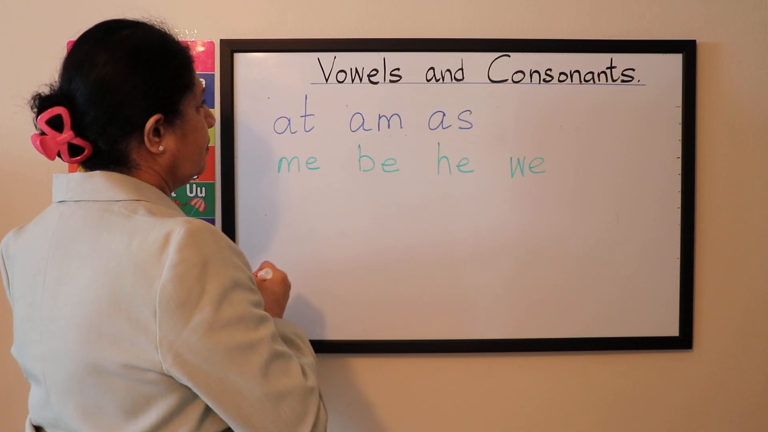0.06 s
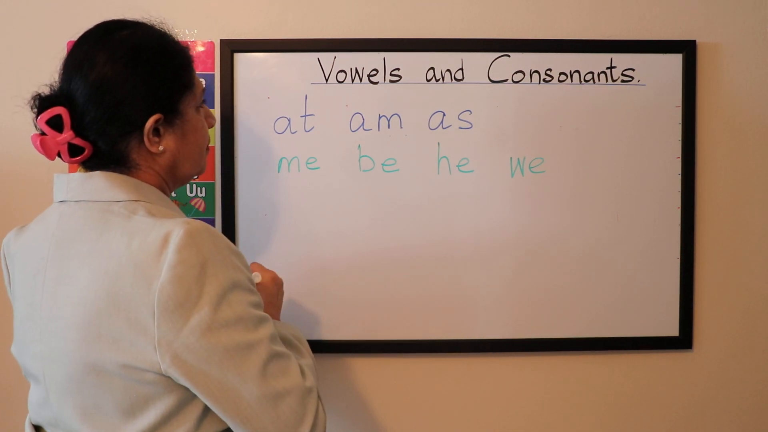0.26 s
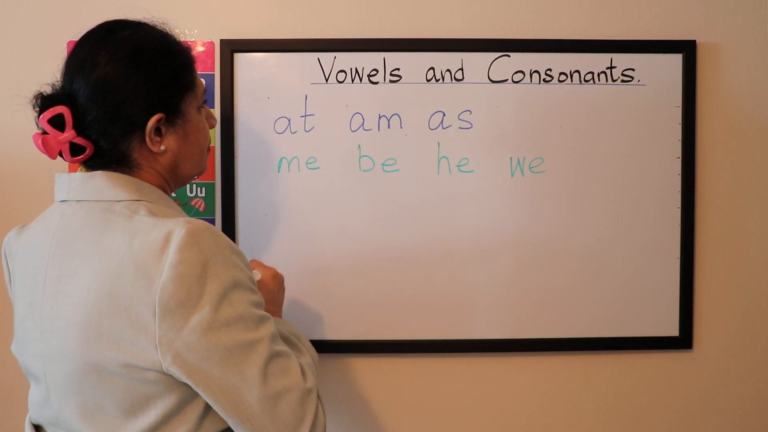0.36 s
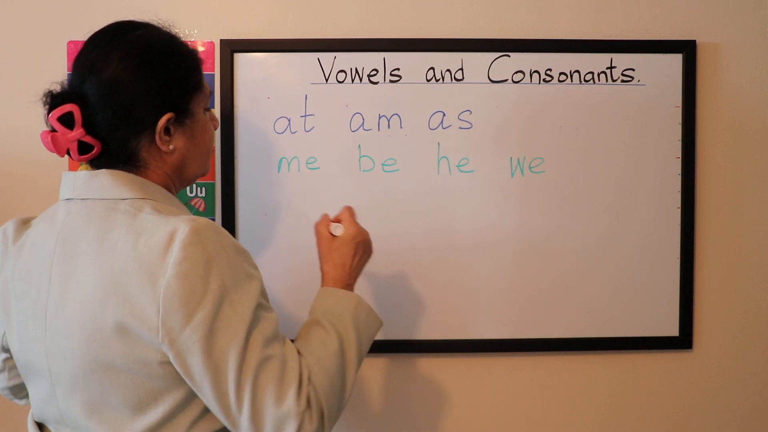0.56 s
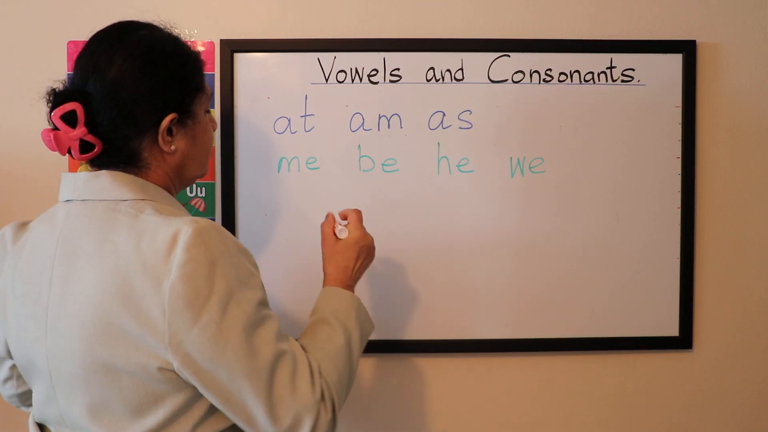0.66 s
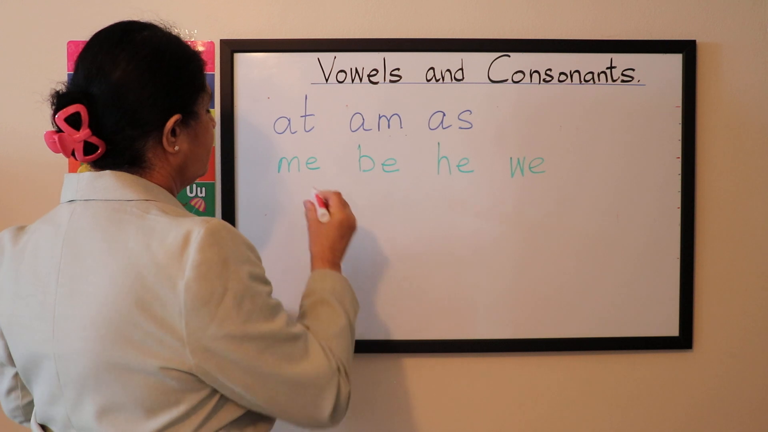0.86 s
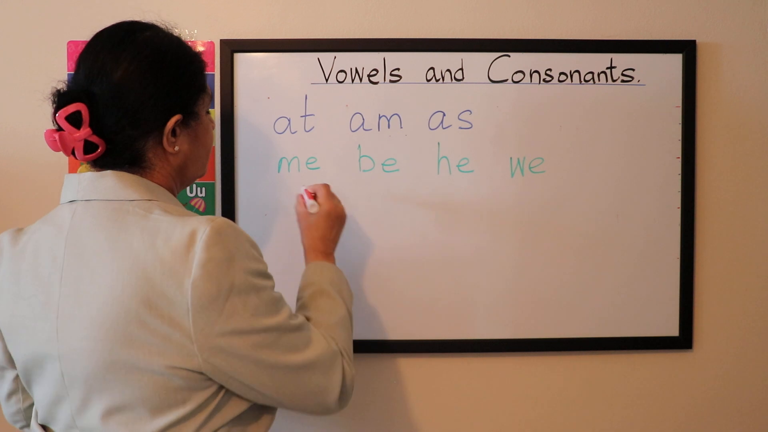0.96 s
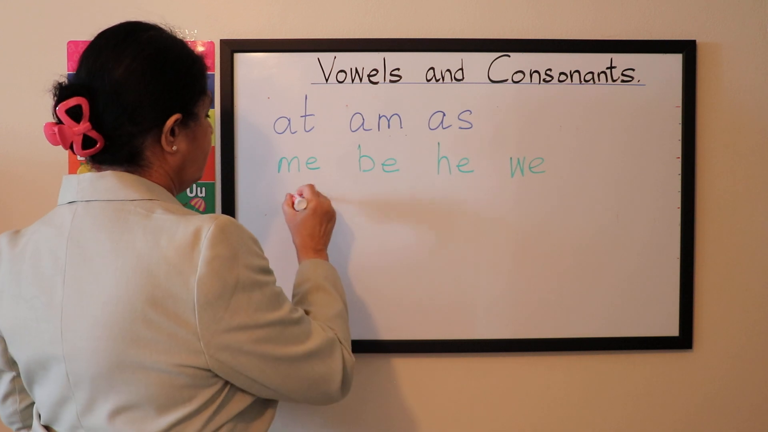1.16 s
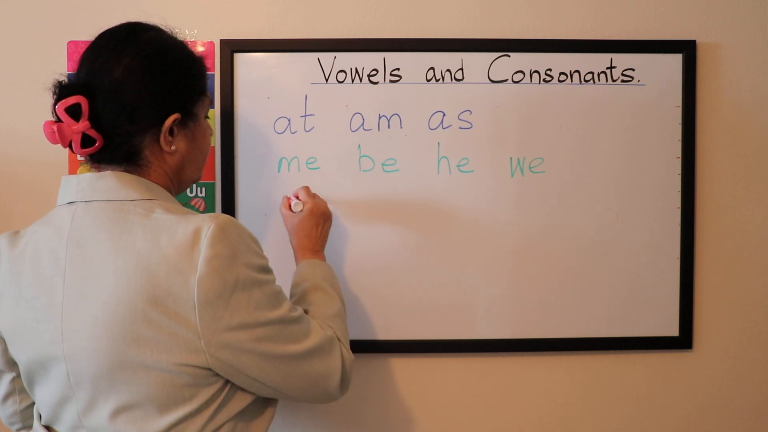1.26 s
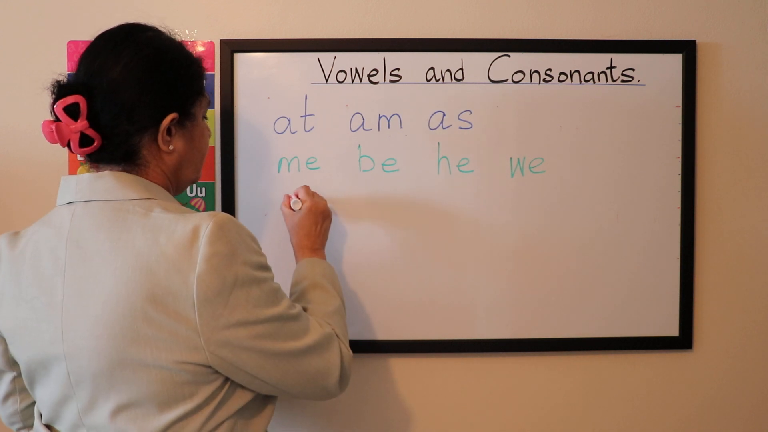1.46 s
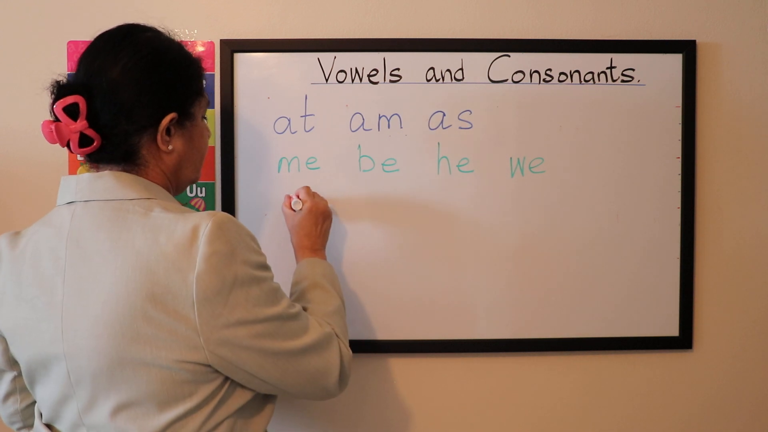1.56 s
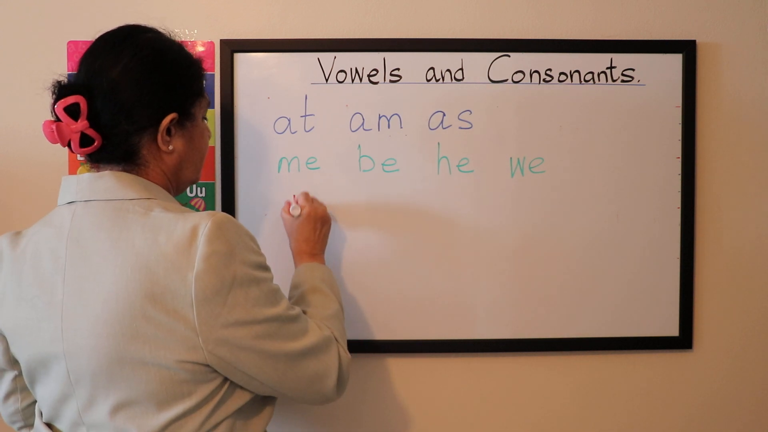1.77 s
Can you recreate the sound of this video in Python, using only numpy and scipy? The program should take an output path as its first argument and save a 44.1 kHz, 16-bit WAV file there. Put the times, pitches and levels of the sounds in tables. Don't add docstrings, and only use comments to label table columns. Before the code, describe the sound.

Light finger taps on a plastic pen, then a short ratcheting burst of crisp clicks as its cap comes loose with small hollow knocks, echoing briefly in a hard classroom with steady ventilation rumble and soft hiss.

```python
import sys
import numpy as np
from scipy import signal
from scipy.fft import rfft, irfft, next_fast_len
from scipy.io import wavfile

SR = 44100
rng = np.random.default_rng(int(sys.argv[2]) if len(sys.argv) > 2 else 0)


def materialize(psi):
    bounded = np.clip(np.atleast_2d(psi).T, -1, 1)
    quanta = np.round(bounded * 32767).astype(np.int16)
    wavfile.write(sys.argv[1], SR, quanta)


def volts(x):
    e = np.asarray(x, float) / 20
    return 10 ** e


N = 79380


def along(points, hz):
    point_hz, value = np.transpose(points)
    return np.interp(np.log(hz + 1), np.log(point_hz + 1), value)


def filtered(x, response):
    size = next_fast_len(N + 8192)
    spectrum = rfft(x, size) * response(np.fft.rfftfreq(size, 1 / SR))
    return irfft(spectrum, size)[..., :N]


# pitch_hz, likeness [-1 to 1]
LIKENESS = [(60, 0.85), (180, 0.83), (550, 0.41), (1650, -0.043), (4970, -0.071), (15000, 0.03)]


def rush(shape, level_db):
    def mid_and_side(hz):
        angle = np.arccos(np.clip(along(LIKENESS, hz), -1, 1)) / 2
        return shape(hz) * np.array([np.cos(angle), np.sin(angle)])

    mid, side = filtered(rng.standard_normal((2, N)), mid_and_side)
    return volts(level_db) * np.array([mid + side, mid - side]) / np.std(mid)


# pitch_hz, level_db [per Hz]
AIR = [(12, -22), (22, -1.5), (40, -6.5), (150, -8), (260, -12.5), (527, -14.5), (659, -22.5),
       (1200, -22.5), (1560, -53), (2640, -120)]
# pitch_hz, level_db [per Hz]
HISS = [(710, -42), (1200, -2), (1460, -4), (2570, -9), (4840, -17), (6930, -13.5), (10900, -14.5),
        (14800, -24), (16200, -22)]
# pitch_hz, level_db, width_hz
DUCT = [(519, -66.5, 8.3), (406.4, -70, 23), (850.5, -76.5, 18), (1348, -76.5, 24)]
# pitch_hz, level_db
FAN = [(58.4, -62), (119.9, -62), (175.8, -68), (233.6, -55), (239.9, -60), (227.4, -70), (469.8, -75),
       (694.5, -74), (700.7, -69)]


def ventilation():
    air = rush(lambda hz: volts(along(AIR, hz)), -51.5)
    hiss = rush(lambda hz: volts(along(HISS, hz)), -59.5)
    out = air + hiss
    t = np.arange(N) / SR - 0.826
    side = np.array([[-1], [1]])
    for pitch_hz, level_db in FAN:
        out += volts(level_db + 3 + 0.8 * side) * np.cos(2 * np.pi * pitch_hz * t + 0.2 * side)
    for pitch_hz, level_db, width_hz in DUCT:
        out += rush(lambda hz: 1 / (1 + (2 * (hz - pitch_hz) / width_hz) ** 2), level_db)
    return out


def strike(out, start_s, modes, gain, attack_s, size=2048):
    start = int(start_s * SR) + 1
    t = (start + np.arange(size)) / SR - start_s
    pitch_hz, level_db, t60_s = np.transpose(modes)[:, :, None]
    ring = np.sum(volts(level_db - 60 * t / t60_s) * np.sin(2 * np.pi * pitch_hz * t), axis=0)
    ring *= (1 - np.exp(-t / attack_s)) ** 2
    out[:, start:start + size] += np.outer(gain, ring)[:, :out.shape[1] - start]


# pitch_hz, t60_s
ROOM = [(300, 0.55), (2000, 0.39), (6000, 0.28), (12000, .2), (16000, 0.18)]
ROOM_DB, ROOM_GAP_S = 2.5, 0.0018


def tail():
    hz, t, spectrum = signal.stft(rng.standard_normal((2, SR // 2)), SR, nperseg=256)
    fade = volts(-60 * t / along(ROOM, hz)[:, None])
    answer = signal.istft(spectrum * fade, SR, nperseg=256)[1]
    return np.pad(answer / np.linalg.norm(answer[0]), ((0, 0), (int(ROOM_GAP_S * SR), 0)))


def room(x, answer):
    return volts(ROOM_DB) * signal.fftconvolve(x[:1], answer, axes=1)[:, :N]


# start_s, level_db, pitch_hz, crack_db
TICKS = [(.002, -43, 2900, -11), (.034, -54, 2520, -14), (.061, -42.5, 2980, -20), (.066, -47, 2740, -16),
         (.099, -56.5, 2280, -16), (.130, -43, 3130, -16), (.1305, -37, 1200, -23), (.164, -46.5, 2860, -8),
         (.197, -51, 3430, -15), (.228, -43, 3000, -18), (.9785, -46, 2450, -11), (1.085, -48, 1750, -16),
         (1.4085, -56, 3270, -14), (1.544, -51, 2200, -16), (1.6085, -47, 3480, -11),
         (1.611, -42.5, 2050, -17), (1.6127, -41.5, 8700, 3), (1.616, -44, 2500, -14),
         (1.617, -42, 2020, -19), (1.775, -60, 3000, -14)]


def fingers():
    out = np.zeros((2, N))
    t = np.arange(512) / SR
    t60_s, crack_t60_s = 0.016, 0.0046
    for start_s, level_db, pitch_hz, crack_db in TICKS:
        modes = [(pitch_hz, 0, t60_s),
                 (pitch_hz * 1.3, -6, t60_s * 0.71),
                 (pitch_hz * 0.797, -7, t60_s * 0.76)]
        strike(out, start_s, modes, volts(level_db + np.array([-1.5, 0])), attack_s=0.0004)
        crack = volts(level_db + crack_db - 60 * t / crack_t60_s) * rng.standard_normal(len(t))
        out[:, int(start_s * SR):][:, :len(t)] += crack
    return out + volts(-7.5) * room(out, tail())


def thin(hz):
    bass_loss = (1j * hz / (760 + 1j * hz)) ** 2
    notch_hz, notch_width_hz, notch_depth = 4840, 320, 0.63
    band = 1j * hz * notch_width_hz
    return bass_loss * (1 - notch_depth * band / (notch_hz ** 2 - hz * hz + band))


# pitch_hz, level_db, t60_s, change_db [first slip to last]
RIM = [(12000, -1, 0.0017, -5.5), (13800, -4.5, 0.0011, 0), (6300, -9.5, 0.0026, -6.5)]
# pitch_hz, level_db, t60_s, change_db [first slip to last]
BARREL = [(2270, 3, 0.0025, 4.5), (2900, -0.5, 0.0034, -3), (3685, 9, 0.0024, -8),
          (1385, -12.5, 0.0055, 7.5), (900, -24, 0.0034, 13.5)]


def slip_modes(ring_hz, treble_db, barrel_db, progress):
    modes = [(ring_hz, 0, 0.0044)]
    modes += [(hz, db + treble_db + change_db * progress, t60_s) for hz, db, t60_s, change_db in RIM]
    modes += [(hz, db + barrel_db + change_db * progress, t60_s) for hz, db, t60_s, change_db in BARREL]
    luck = rng.standard_normal((len(modes), 2))
    return [(hz * (1 + 0.012 * detune), db + 1.2 * scatter, t60_s)
            for (hz, db, t60_s), (detune, scatter) in zip(modes, luck)]


# start_s, level_db [snap], barrel_db [barrel under the snap], pitch_hz [cap ring]
SLIPS = [(0.2366, -18.5, -7, 7060), (.2510, -12.5, -9.5, 6500), (0.2628, -12.5, -14, 6620),
         (0.2705, -10.5, -12.5, 6900), (0.279, -15, -13.5, 7100), (.2863, -9.5, -13, 7060),
         (0.2946, -9.5, -14, 7100), (0.3034, -19, -19, 7340), (0.3121, -11, -12, 7400),
         (0.3245, -9, -15, 7700), (0.3383, -9, -12, 7300), (0.35, -15.5, -18.5, 7260),
         (0.3655, -5.5, -15.5, 7900), (.3814, -10, -13.5, 7180), (0.3988, -6, -14, 7860),
         (0.4213, -6.5, -13.5, 7500), (0.4458, -7, -15, 7140)]
# delay_ms, left_db, right_db, pitch_hz [ring on this path], treble_db
ECHOES = [(1.1, -10, -6, 8400, 5), (1.4, -10, -6, 7700, 4), (4.2, -3, -5, 8100, 9), (4.8, -4, -2, 9450, 6),
          (5.4, -12, -8, 8000, 3),
          (9.8, -17, -12, 7700, 0), (11.6, -10, -17, 7700, 0), (17.3, -13, -12, 8200, 2),
         (19.9, -19, -13, 8600, 3)]


def cap():
    near = np.zeros((2, N))
    far = np.zeros((2, N + SR))
    shared_tail = tail()
    echoes = ECHOES
    lags_ms = np.append(0, 0.019 * rng.standard_normal(len(echoes)))
    attack_s, size = 0.000059, 400
    first_s, last_s = SLIPS[0][0], SLIPS[-1][0]
    for start_s, level_db, barrel_db, cap_hz in SLIPS:
        progress = (start_s - first_s) / (last_s - first_s)
        into_room = np.zeros((1, 1024))
        direct = (0.00036, -2, 0, cap_hz, -3)
        for path, lag_ms in zip([direct] + echoes, lags_ms):
            delay_ms, left_db, right_db, ring_hz, treble_db = path
            modes = slip_modes(ring_hz, treble_db, barrel_db, progress)
            wander_ms = 0.03 * rng.standard_normal()
            at_s = start_s + (delay_ms + wander_ms) / 1000
            strike(near[:1], at_s + lag_ms / 1000, modes, [volts(level_db + left_db)], attack_s, size)
            strike(near[1:], at_s, modes, [volts(level_db + right_db)], attack_s, size)
            if delay_ms < 5:
                strike(into_room, delay_ms / 1000, modes, [volts(level_db + right_db - 6)], attack_s, size)
        slip_tail = shared_tail + volts(-3.5) * tail()
        answer = volts(ROOM_DB) * signal.fftconvolve(into_room, slip_tail, axes=1)
        far[:, int(start_s * SR):][:, :answer.shape[1]] += answer
    return filtered(near + far[:, :N] * volts([[-1.5], [0]]), thin)


# start_s, level_db
POP = [
    (0.4484, -25),
    (0.4523, -28.5),
    (0.4598, -23),
    (.4640, -26),
]
# pitch_hz, level_db, t60_s
HOLLOW = [(296, -7, 0.015), (446, -8, 0.014), (753, -6, 0.013), (1197, -6, 0.022), (1960, 1.5, 0.017),
          (2680, 6, 0.0065), (4060, 10, 0.0035)]


def pop():
    out = np.zeros((2, N))
    for start_s, level_db in POP:
        luck = rng.standard_normal((len(HOLLOW), 2))
        modes = [(hz * (1 + 0.056 * detune), db + 2 * scatter, t60_s)
                 for (hz, db, t60_s), (detune, scatter) in zip(HOLLOW, luck)]
        strike(out, start_s, modes, volts(level_db + np.array([-2.5, 0])), attack_s=0.0003)
    return out + volts(-5.0) * room(out, tail())


def scene():
    return ventilation() + fingers() + cap() + pop()


def top_cut(x):
    return signal.sosfilt(signal.butter(12, 16510, fs=SR, output="sos"), x)


def record(dry):
    mix = filtered(dry, lambda hz: hz < 15800)
    return top_cut(mix)


dry = scene()
out = record(dry)
materialize(out)
```